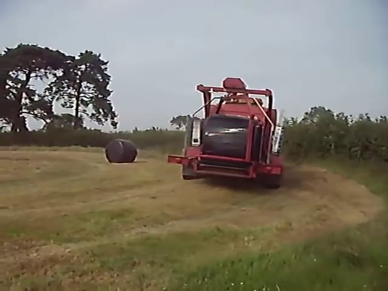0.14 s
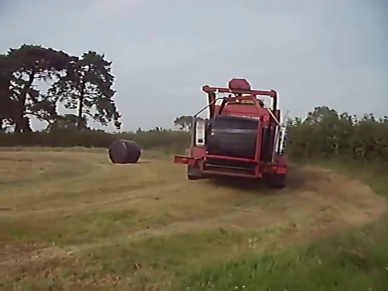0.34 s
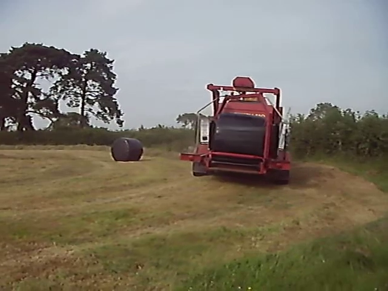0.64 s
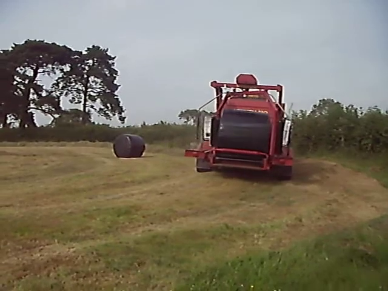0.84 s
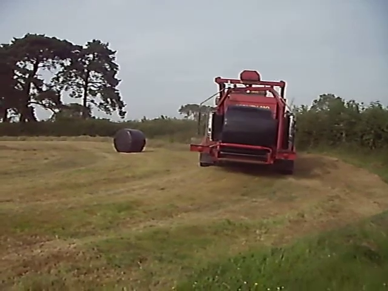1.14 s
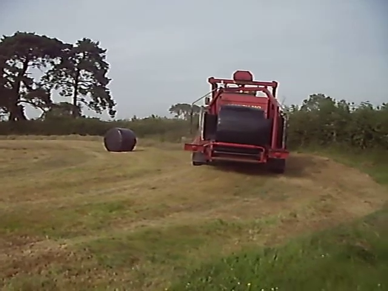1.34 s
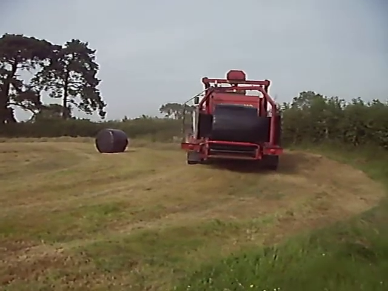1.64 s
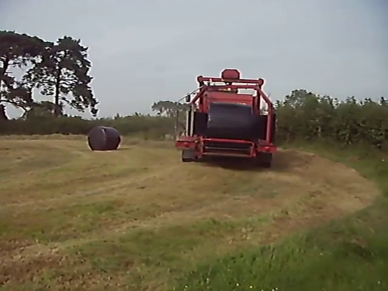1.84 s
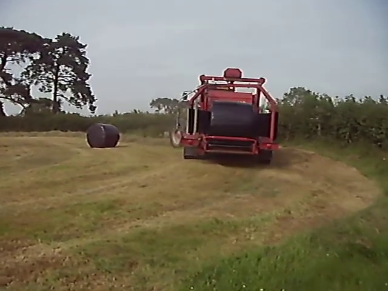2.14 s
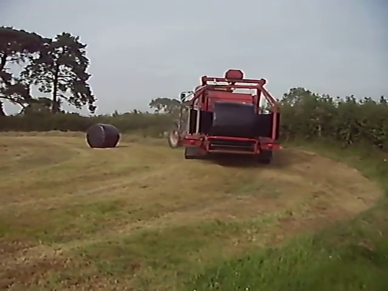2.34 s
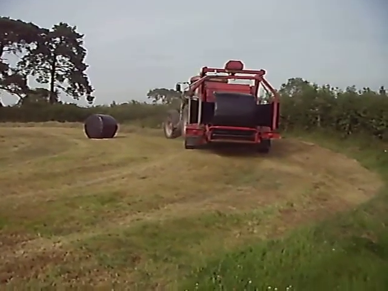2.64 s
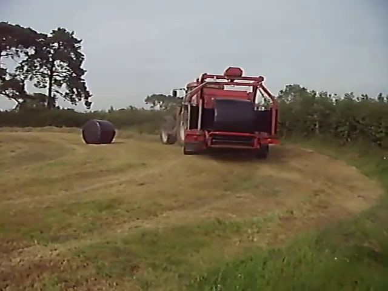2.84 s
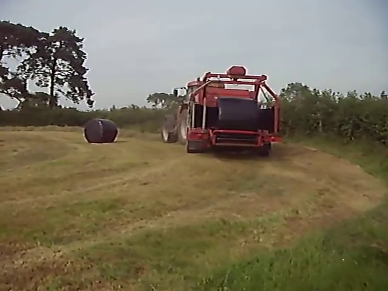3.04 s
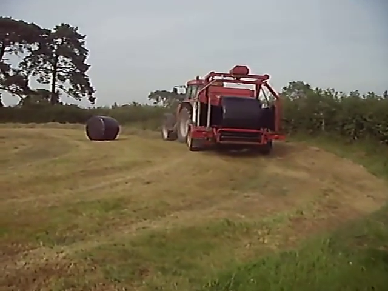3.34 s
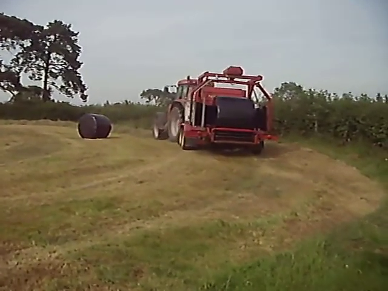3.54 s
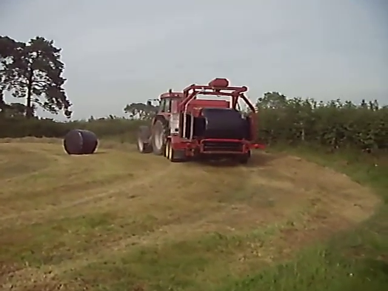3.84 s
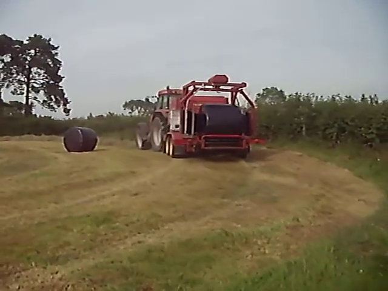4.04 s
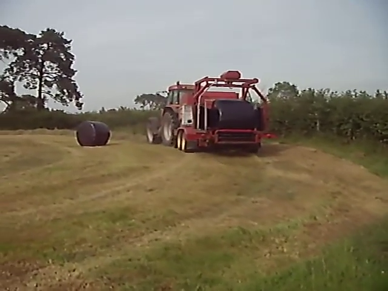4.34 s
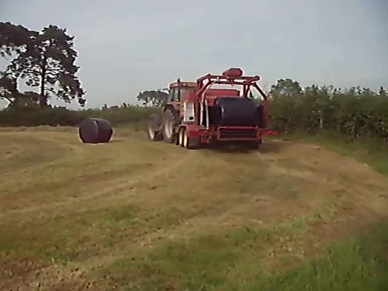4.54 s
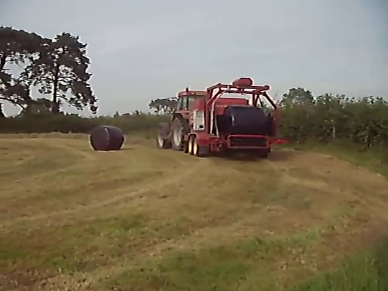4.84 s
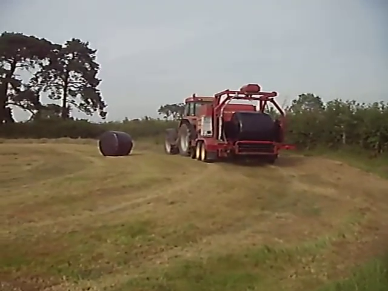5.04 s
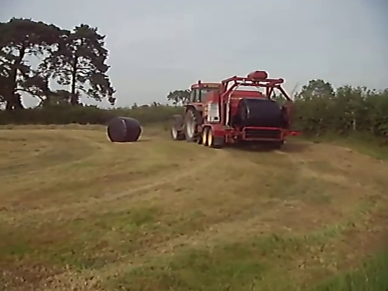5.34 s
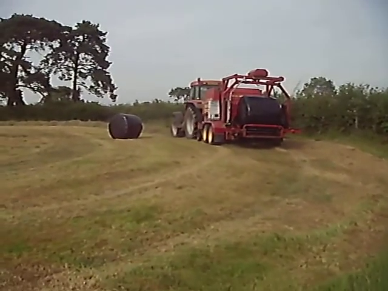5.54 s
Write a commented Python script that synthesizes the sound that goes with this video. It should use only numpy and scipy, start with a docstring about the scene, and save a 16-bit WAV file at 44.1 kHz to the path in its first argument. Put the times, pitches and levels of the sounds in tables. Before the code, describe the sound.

Diesel hum, whining gears and fast rhythmic metal clatter cross an open field, swamped mid-way by crackling, distorted wind buffeting.

```python
"""On a stubble field, a tractor tows a baler-wrapper, heard mostly from behind at first, then more from its side.
The diesel drone and the whining gears are wavering sine tones; chains and rollers rattle as dense tiny impacts.
A shaft clashes about eight times a second in bursts of such impacts, panels boom and a dry joint squeaks.
Gusts of filtered noise and short wobbling tones buffet a small narrow-band camera microphone and overload it."""
import sys
import numpy as np
from scipy import signal
from scipy.fft import rfft, irfft
from scipy.io import wavfile

SR = 44100
rng = np.random.default_rng(int(sys.argv[2]) if len(sys.argv) > 2 else 0)


def store_pcm(level_fs):
    """Save levels as 16-bit WAV."""
    pcm = np.round(np.clip(level_fs, -1, 1) * 32767).astype(np.int16)
    wavfile.write(sys.argv[1], SR, np.atleast_2d(pcm).T)


N = 251370
T = np.arange(N) / SR  # time of each sample [s]
HZ = np.maximum(np.arange(N // 2 + 1) * SR / N, 1)  # frequencies of the spectrum, kept above zero for the logs

# engine speed, sagging a little under load: (time [s], firing rate [Hz])
FIRING_RATE = [(0, 152.3), (1.2, 152), (2.7, 150), (3.5, 148.5), (4.4, 147.6), (5.7, 147.6)]
# the machine's run: (time [s], rattle level [dB], side turned to the microphone [0-1])
MACHINE_RUN = [(0, -16, 0.1), (.3, -18, 0.06), (.7, -17.5, 0.44), (1.1, -17, 0.3), (1.5, -18.5, 0.3),
               (2.1, -18, 0.33), (2.7, -17.5, 0.6), (3.2, -15.5, 0.8), (3.8, -18.5, 0.69),
               (4.4, -17.5, 0.98), (4.65, -20, 1), (5.2, -17, 0.67), (5.7, -18, 0.89)]
# exhaust tones: (multiple of the firing rate, level from behind [dB], level from the side [dB])
EXHAUST_TONES = [(.5, -38.5, -32.5), (1, -31.5, -36.5), (2, -37.5, -38.5), (3, -45.5, -49.5), (4, -27, -34),
                 (6, -41.5, -35.5), (7, -42, -35)]
# whining gears and bearings: (pitch [Hz], level from behind [dB], level from the side [dB])
GEAR_WHINES = [(1168, -35, -48), (1335, -44, -40), (1733, -43, -52), (2051, -41, -50), (2168, -55, -38),
               (2364, -50, -39), (2444, -41, -48), (2939, -54, -42), (3585, -56, -48)]
# tone colour of the rattle: (frequency [Hz], relative level [dB])
RATTLE_COLOUR = [(30, -22), (90, -18), (160, 6.5), (280, -10.5), (410, -6), (700, 1.5), (820, -2),
                 (1250, -1.5), (1550, -1.5), (2500, -5), (3100, -8), (3350, -9), (3750, -11), (4300, -20.5)]
# ringing of the steel body heard from behind, then from the side: (frequency [Hz], width [Hz], boost [dB])
REAR_RINGS = [(527, 67, 15.5), (622, 51, 13), (980, 140, 8.5), (1178, 63, 9), (1900, 57, 2), (2640, 86, 6)]
SIDE_RINGS = [(570, 140, 8.1), (902, 70, 11.3), (1049, 190, 9.4), (1820, 150, 3.5), (2160, 27, 3.4),
              (2470, 290, 6.7), (2986, 73, 8.2)]

# light air between the gusts: (time [s], wind strength [dB])
LIGHT_AIR = [(0, -17), (.25, -20), (.75, -21), (1.1, -17), (3.15, -21.5), (3.7, -15.5), (4.6, -20),
             (4.85, -16.5), (5.05, -19), (5.7, -17.5)]
# gusts, short surges standing out of the long ones: (time of full strength [s], hold [s], wind strength [dB])
GUST_TIMES = [(1.306, .27, -13), (1.685, 0.039, -7.5), (1.81, 1.25, -10), (2.009, 0.16, -4.5),
              (2.259, .06, -3), (2.385, 0.17, 1.5), (2.569, 0.079, -7), (2.779, .14, -4.5),
              (3.848, .22, -8), (4.005, 0.068, -5), (4.165, 0.15, -11)]
GUST_ATTACK_S, GUST_RELEASE_S = .018, .035
# tone colour of the wind's low rumble: (frequency [Hz], relative level [dB])
RUMBLE_COLOUR = [(12, -5), (25, 2), (55, 3), (110, 2.5), (190, 0), (300, -3.5), (450, -8.5), (700, -18.5),
                 (1100, -30.5), (2000, -37.5), (4000, -62.5)]
# tone colour of the wind's higher roar: (frequency [Hz], relative level [dB])
ROAR_COLOUR = [(100, -8.5), (300, -0.5), (480, -2), (750, -4.5), (1200, -14.5), (2000, -24), (4000, -55.5)]

# the baler's drive clashes once each shaft turn: nominal time of the first clash, length of a turn
FIRST_CLASH_S, TURN_S = .035, .1231
# strength of each clash in a repeating cycle of eight turns: (relative level [dB])
CLASH_STRENGTHS = [-15.5, -18.5, -19.5, -19, -18.5, -17.5, -15, -21.5]
# slack in the drive: spread of the clashes in time and in strength
CLASH_SLACK_S, CLASH_SCATTER_DB = .0015, 0.07
# how hard the drive clashes as time passes: (time [s], relative gain [dB])
DRIVE_FORCE = [(0, -2), (.75, 0), (1.45, -4.5), (2.0, -1), (2.55, -1.5), (2.95, -3), (3.45, 1), (4.3, 0),
               (4.95, 1.5), (5.7, -3.5)]
# tone colour of a clash: (frequency [Hz], relative level [dB])
CLASH_TONE = [(200, -28), (600, 8.5), (820, 2), (1080, 7), (1500, 0.5), (2050, 6), (2250, -4), (2550, 2),
              (3050, 2), (3350, -4), (3700, -9), (4300, -13)]
# ringing of the clashing parts: (frequency [Hz], width [Hz], boost [dB])
CLASHING_PARTS = [(990, 84, 5), (1345, 30, 9), (2014, 70, 3), (2430, 210, 7.5), (3064, 69, 3.5),
                  (3600, 210, 7.5)]

# single loud buffets on the microphone: (time [s], relative level [dB], middle pitch [Hz], length [s])
LOUD_BUFFETS = [(0.053, -10, 200.3, 0.016), (0.095, -13, 101, 0.018), (0.838, -7.5, 199.6, 0.014),
                (0.947, -2.5, 240, 0.0041), (1.315, -0.5, 198.7, 0.0093), (1.366, 2.5, 380, 0.0077),
                (1.427, -1, 220, 0.0038), (1.464, 3, 300, 0.0025), (1.544, -0.5, 290, 0.0077),
                (1.695, 4.5, 338, 0.0028), (1.804, 0, 315, 0.0036), (2.083, 8, 350.3, 0.01),
                (2.378, 3, 450, 0.0039), (2.466, 6, 621, 0.0042), (2.663, 10.5, 448, 0.0023),
                (2.817, 3, 380, 0.0079), (3.046, 0, 262.3, 0.0072), (3.377, -4.5, 170, 0.01),
                (3.492, -5.5, 200, 0.0071), (3.773, 2.5, 70.1, 0.0057), (3.898, 2.5, 420, 0.008),
                (4.176, 1.5, 139, 0.005), (4.316, -3, 150.1, 0.012), (4.913, -2, 331, 0.0066),
                (5.047, -7, 298.1, 0.0039), (5.187, -5, 189, 0.0095), (5.427, -2, 290, 0.0063),
                (5.584, -6.5, 95.7, 0.016)]
# chance buffets that grow with the wind: how many a second; level and middle pitch at wind strength CHANCE_GUST_DB
CHANCE_PER_S, CHANCE_DB, CHANCE_HZ, CHANCE_GUST_DB = 13, -1.5, 250.6, -7
CHANCE_LENGTH_S, CHANCE_GROWTH_DB_PER_DB, CHANCE_OCTAVES_PER_DB = 0.0049, 1.09, 0.17

# jolts that set the body panels booming: (time [s], level [dB], length [s])
PANEL_JOLTS = [(0.085, -19, 0.044), (0.445, -16, 0.017), (5.176, -19.5, 0.028)]
# tone colour of the booming panels: (frequency [Hz], relative level [dB])
PANEL_COLOUR = [(300, -25.5), (480, -9), (560, 0), (610, -10.5), (720, -14), (1200, -33.5)]
# squeaks of a dry joint: (time [s], pitch [Hz], relative level [dB], length [s])
JOINT_SQUEAKS = [(4.756, 2170, -13, .006), (4.772, 2350, -11.5, .008), (4.962, 3020, -18, .008),
                 (4.969, 3630, -23, .006)]

# what the camera passes: edge of its narrow band, clipping level, and the top edge after clipping
BAND_HZ, CEILING, TOP_HZ = 4250, .71, 15800
# the camera's response after the overload: (frequency [Hz], gain [dB])
CAMERA_RESPONSE = [(3000, 0.5), (3900, 0), (4700, -6.5), (6300, -5.5), (8000, -2), (10000, -6),
                   (15000, -6.5)]


def undb(db):
    """Turn decibels into a gain."""
    return 10 ** (np.asarray(db) / 20)


def unit(x):
    """Scale to an average strength (rms) of 1."""
    return x / np.sqrt(np.mean(x ** 2))


def curves(table):
    """Draw each column of a table as a line through time."""
    s, *columns = np.transpose(table)
    return [np.interp(T, s, column) for column in columns]


def response(points):
    """Join (frequency, dB) points into a gain for every frequency."""
    hz, db = np.transpose(points)
    return undb(np.interp(np.log(HZ), np.log(hz), db))


def colour(x, points, resonances=()):
    """Filter by a smooth spectrum with resonances standing on it, then scale to rms 1."""
    lift = 0
    for hz, width, peak_db in resonances:
        lift = lift + (undb(peak_db) - 1) / (1 + (2 * (HZ - hz) / width) ** 2)
    return unit(irfft(rfft(x) * response(points) * (1 + lift), N))


def walk(rate):
    """Wander smoothly by chance with spread 1, moving about rate times a second."""
    noise = rng.standard_normal(N)
    return unit(irfft(rfft(noise) * np.exp(-(HZ / rate) ** 2), N))


def swell(s, length):
    """Rise and fall like a bell around time s."""
    return np.exp(-np.minimum(((T - s) / length) ** 2 / 2, 50))


def turns(hz):
    """Add up a changing frequency into a running phase."""
    return 2 * np.pi * np.cumsum(hz) / SR


def grains(per_s):
    """Scatter dense tiny impacts of unequal size."""
    return (rng.random(N) < per_s / SR) * rng.standard_normal(N)


def engine(firing_hz, side, waver_db=2):
    """The exhaust drones on multiples of the firing rate; the moving air makes each one waver."""
    phase = turns(firing_hz * (1 + 0.0051 * walk(16)))
    drone = 0
    for multiple, rear_db, side_db in EXHAUST_TONES:
        db = rear_db + side * (side_db - rear_db) + waver_db * walk(6.2)
        start_phase = 2 * np.pi * rng.random()
        drone = drone + undb(db) * np.sin(multiple * phase + start_phase)
    return drone


def gears(side):
    """Gears and bearings whine unsteadily; turning the machine hides some and uncovers others."""
    whine = 0
    for hz, rear_db, side_db in GEAR_WHINES:
        db = rear_db + side * (side_db - rear_db) + 1.4 * walk(20)
        whine = whine + undb(db) * np.sin(turns(hz + 14 * walk(43.6)))
    return whine


def rattle(side, firing_hz, knock=0.04, flutter_db=0.86):
    """Chains, rollers and diesel knock shake the body, which rings differently from behind and from the side."""
    knocking = 1 + knock * np.cos(turns(firing_hz))
    shaking = grains(per_s=9000) * knocking * undb(flutter_db * walk(37))
    from_behind = colour(shaking, RATTLE_COLOUR, REAR_RINGS)
    from_side = colour(shaking, RATTLE_COLOUR, SIDE_RINGS)
    return (1 - side) * from_behind + side * from_side


def airflow():
    """Wind strength in dB: each gust rises quickly out of the breeze, holds and drops away."""
    breeze_db, = curves(LIGHT_AIR)
    flow = undb(breeze_db)
    for start, hold, db in GUST_TIMES:
        corners = [start - GUST_ATTACK_S, start, start + hold, start + hold + GUST_RELEASE_S]
        gust = undb(db) * np.interp(T, corners, [0, 1, 1, 0])
        flow = np.maximum(flow, gust)  # the stronger wind wins
    return 20 * np.log10(flow)


def wind(gust_db, bright_per_db=0.67, bright_from_db=-7, flutter_db=3.0, chop_db=4.0):
    """Air tumbles at the microphone port as a low rumble; faster air adds more high roar, in choppy bursts."""
    rumble = colour(rng.standard_normal(N), RUMBLE_COLOUR)
    roar = colour(rng.standard_normal(N), ROAR_COLOUR)
    # the roar's level is set against the rumble
    roar_db = -6.5 + bright_per_db * (gust_db - bright_from_db) + chop_db * walk(60)
    wind_db = gust_db - 2.0 + flutter_db * walk(45)
    return undb(wind_db) * (rumble + undb(roar_db) * roar)


def clashes(rise_s=0.0052, fall_s=0.017, tail_s=0.05, tail_share=0.46):
    """Each turn, slack steel parts run together in a short cluster of impacts, then chatter on."""
    beats = np.arange(FIRST_CLASH_S, T[-1], TURN_S)
    drive_db, = curves(DRIVE_FORCE)
    force = np.zeros(N)
    for turn, (late, harder) in enumerate(rng.standard_normal((len(beats), 2))):
        since = T - beats[turn] - CLASH_SLACK_S * late
        db = CLASH_STRENGTHS[turn % len(CLASH_STRENGTHS)] + CLASH_SCATTER_DB * harder
        rise = np.exp(np.minimum(since, 0) / rise_s)
        after = np.maximum(since, 0)
        # a fast fall for the clash, a slow one for the chatter
        fall = (1 - tail_share) * np.exp(-after / fall_s) + tail_share * np.exp(-after / tail_s)
        force += undb(db) * rise * fall
    impacts = colour(grains(per_s=16000), CLASH_TONE, CLASHING_PARTS)
    return undb(2.5 + drive_db) * force * impacts


def buffets(gust_db):
    """Swirling air shakes the diaphragm in short uneven wobbles; chance ones are harder and higher in faster air."""
    unsteady = 1 + .6 * np.tanh(walk(260))
    loud = 0
    for s, db, hz, length in LOUD_BUFFETS:
        loud = loud + undb(db) * swell(s, length) * np.sin(turns(hz * unsteady))
    # one chance buffet at a random moment in each equal slot of time
    arrivals = (np.arange(120) + rng.random(120)) / CHANCE_PER_S
    passing = sum(swell(s, CHANCE_LENGTH_S) for s in arrivals if s < T[-1])
    excess_db = gust_db - CHANCE_GUST_DB
    chance_hz = CHANCE_HZ * 2 ** (CHANCE_OCTAVES_PER_DB * excess_db) * unsteady
    chance_db = CHANCE_DB + CHANCE_GROWTH_DB_PER_DB * excess_db
    by_chance = undb(chance_db) * passing * np.sin(turns(chance_hz))
    return undb(-3.5) * loud + by_chance


def jolts():
    """Rough ground shakes the large panels, which boom on their lowest resonances."""
    shake = sum(undb(db) * swell(s, length) for s, db, length in PANEL_JOLTS)
    return shake * colour(grains(per_s=14000), PANEL_COLOUR)


def squeaks():
    """A dry joint catches and slips unevenly, so each short squeak is rough."""
    squeaking = 0
    for s, hz, db, length in JOINT_SQUEAKS:
        grip = np.tanh(2 * walk(170))
        tone = np.sqrt(2) * np.sin(2 * np.pi * hz * T)  # rms 1
        squeaking = squeaking + undb(db) * swell(s, length) * grip * tone
    return squeaking


def scene():
    """Add up the machine in the open field and the wind at the microphone."""
    firing_hz, = curves(FIRING_RATE)
    rattle_db, side = curves(MACHINE_RUN)
    side = np.clip(side, 0, 1)
    gust_db = airflow()
    running = engine(firing_hz, side) + gears(side) + undb(rattle_db) * rattle(side, firing_hz)
    air = wind(gust_db) + buffets(gust_db)
    mix = running + air + clashes() + jolts() + squeaks()
    return mix[None]  # one channel


def record(dry):
    """The camera passes a narrow band and clips loud peaks flat; the crackle this adds is dulled a little."""
    narrow_filter = signal.butter(16, BAND_HZ, fs=SR, output="sos")
    narrow = signal.sosfiltfilt(narrow_filter, dry)
    clipped = np.clip(narrow, -CEILING, CEILING)
    dulled = irfft(rfft(clipped) * response(CAMERA_RESPONSE), N)
    top_filter = signal.ellip(8, .05, 50, TOP_HZ, fs=SR, output="sos")
    return signal.sosfiltfilt(top_filter, dulled)


dry = scene()
out = record(dry)
store_pcm(out)
```